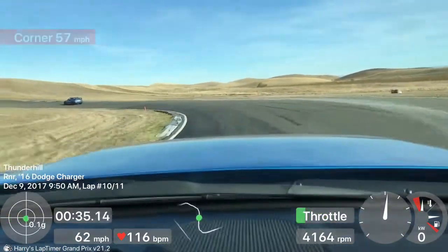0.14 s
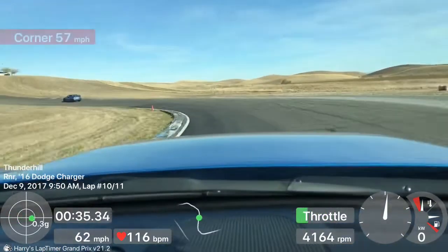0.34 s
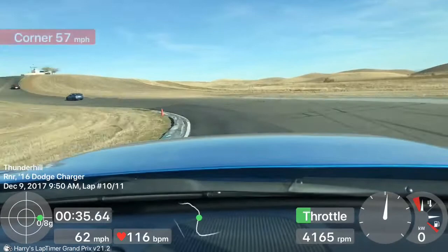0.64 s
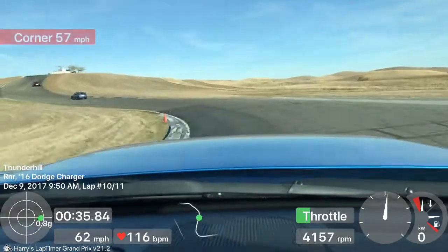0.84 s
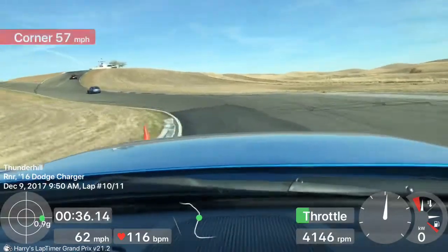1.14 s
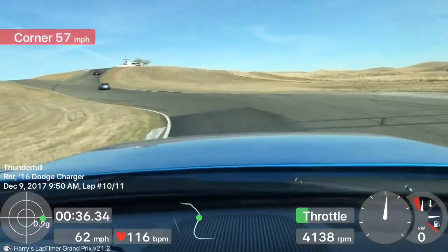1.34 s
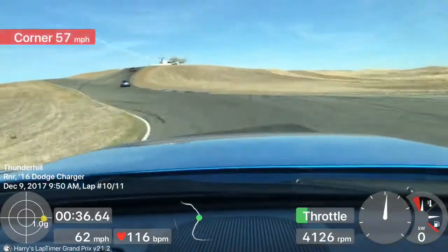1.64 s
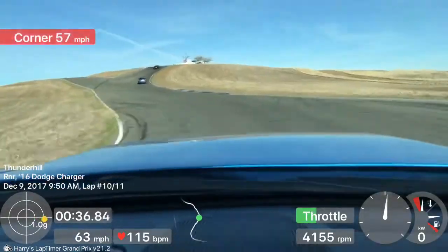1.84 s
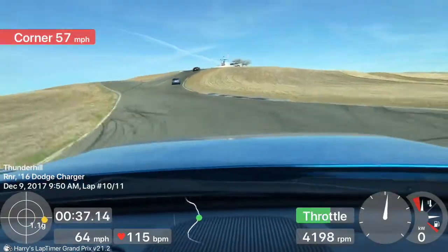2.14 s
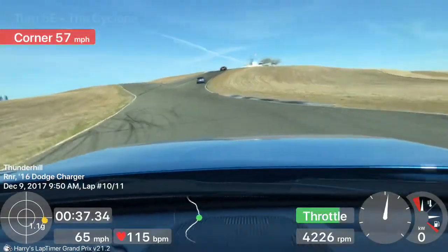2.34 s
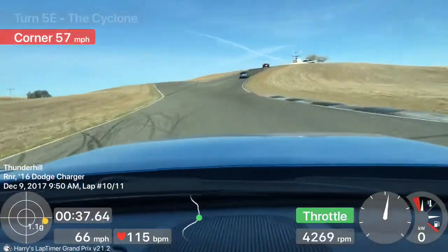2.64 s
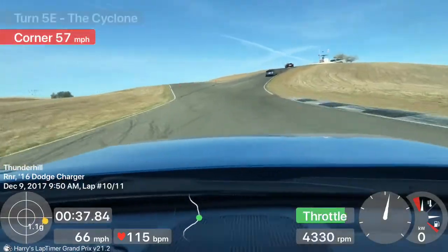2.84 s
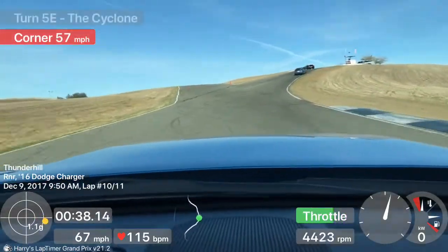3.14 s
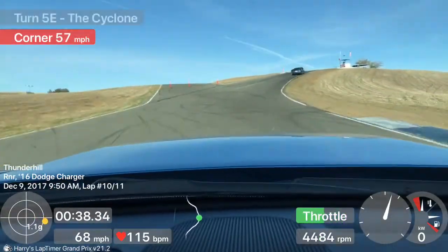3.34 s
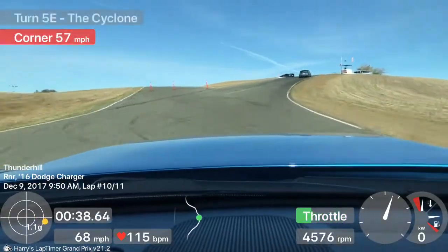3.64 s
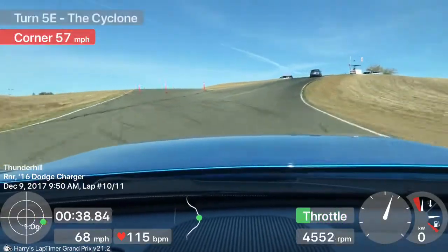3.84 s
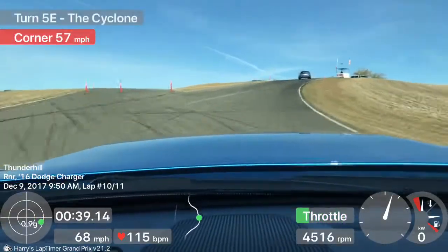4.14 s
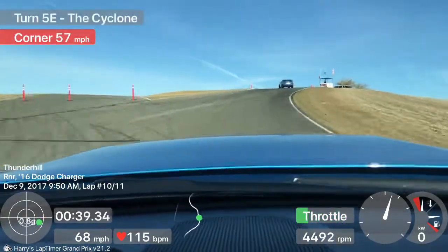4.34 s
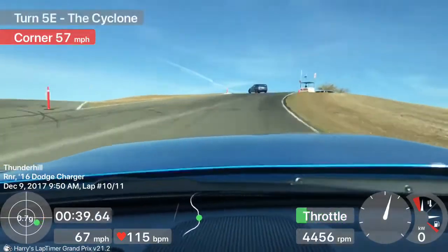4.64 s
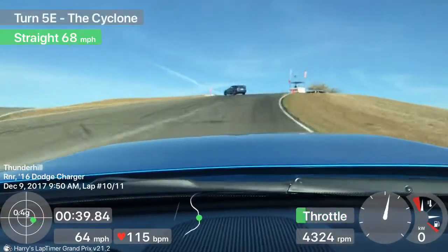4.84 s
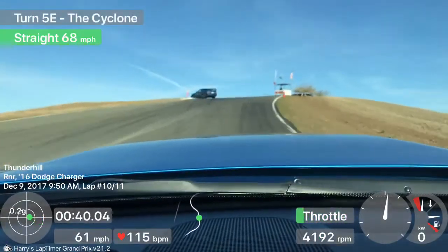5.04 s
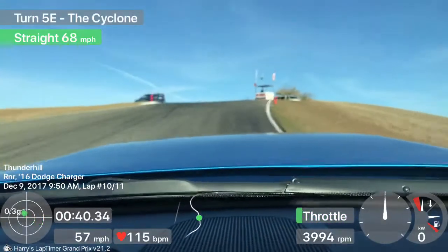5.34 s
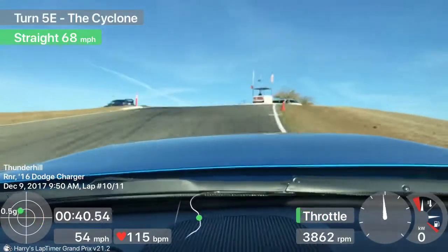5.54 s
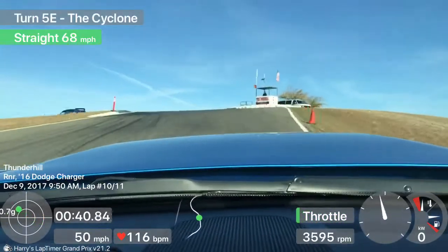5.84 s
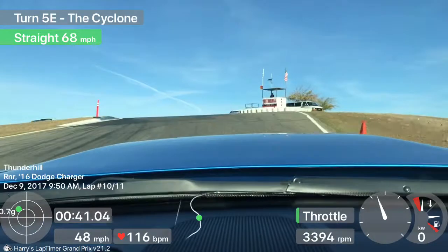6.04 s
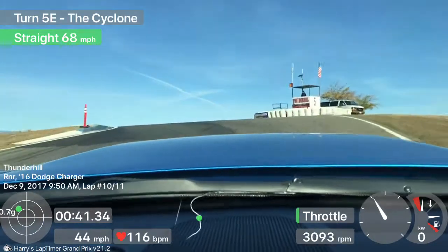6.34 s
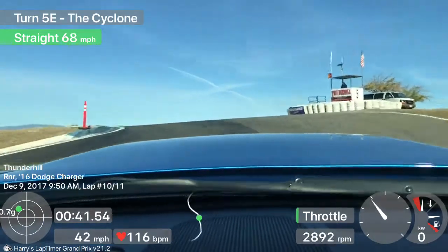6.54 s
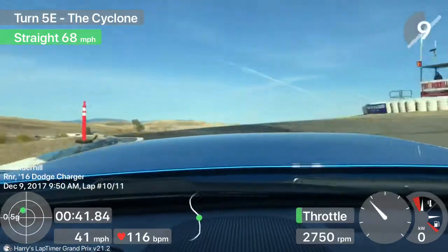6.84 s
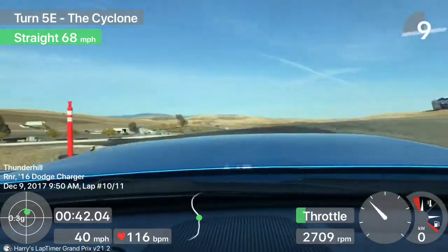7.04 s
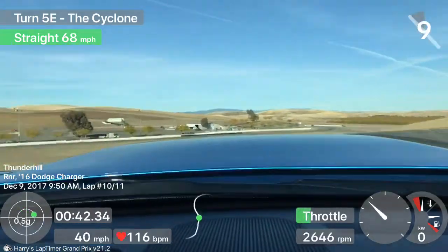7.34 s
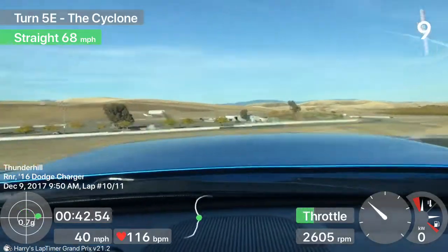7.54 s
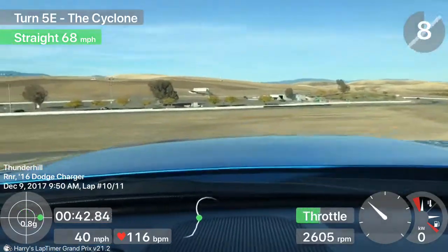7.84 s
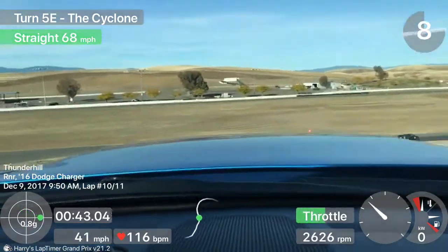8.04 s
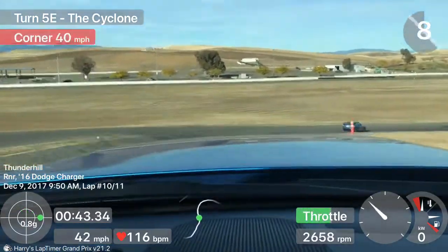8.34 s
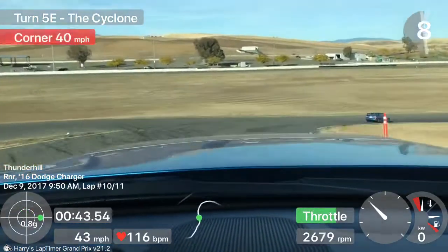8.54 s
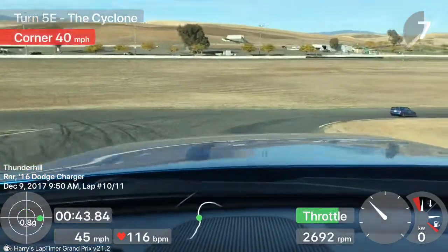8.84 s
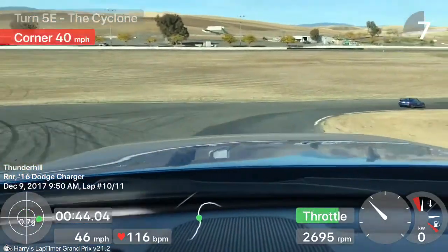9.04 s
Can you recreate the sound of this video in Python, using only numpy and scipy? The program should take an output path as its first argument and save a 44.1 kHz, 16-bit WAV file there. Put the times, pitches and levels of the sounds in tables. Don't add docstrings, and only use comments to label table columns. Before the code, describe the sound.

Heard from the cabin, a powerful engine holds its note, surges, fades for braking with a tyre moan, then growls out of a slow corner.

```python
import sys
import numpy as np
from scipy import signal
from scipy.fft import rfft, irfft
from scipy.io import wavfile
from scipy.ndimage import uniform_filter1d

SR = 44100
rng = np.random.default_rng(int(sys.argv[2]) if len(sys.argv) > 2 else 0)


def natural_amplitude(level_db):
    exponent = np.asarray(level_db, float) / 20
    return 10 ** exponent


def transcribe(signal):
    frames = np.atleast_2d(signal).T
    limited = np.clip(frames, -1, 1)
    pcm = np.round(limited * 32767).astype(np.int16)
    wavfile.write(sys.argv[1], SR, pcm)


N = 405279

# (time [s], level [dB])
CRUISE = [(0, -15), (.3, -16), (1.99, -18.5), (2.13, -23), (2.32, -21.5), (2.66, -33)]
PULL = [(2.02, -44), (2.46, -29.5), (2.95, -18), (3.27, -21.5), (3.36, -31)]
COAST = [(3.32, -32), (3.65, -34), (3.94, -35), (4.56, -27), (4.85, -35.5)]
EXIT = [(5.52, -25.5), (5.8, -22.5), (6.08, -17), (6.9, -18), (6.97, -11), (7.08, -10), (7.3, -13),
        (8.3, -16.5), (9.19, -18.5)]
CRUISE_ORDERS = {6: 0, 4: -27, 9: -20, 10: -21.5, 12: -23.5, 14: -24, 16: -26, 56: -38, 93: -40}, {5: -0.24,
                 11: -15}
PULL_ORDERS = ({8: 0, 4: 0.6, 3: -14, 5: -9.5, 6: -15.5, 16: -13, 20: -30, 70: -36}, {9: -5, 10: -6, 11:
               -13, 14: 1, 17: -12, 18: -3})
COAST_ORDERS = {9: 0, 5: 6.7, 6: -0.39, 10: -8.5}, {14: -1.5, 17: 0, 23: -3.5}
EXIT_ORDERS = {8: 0, 6: -22.5, 7: -27, 9: -26}, {10: 0, 16: 0.45}
# (start level [dB], peak time [s], peak level [dB], end level [dB])
SIDE_ORDERS = [
    (-24.5, 1.47, -31.5, -20.5),
    (-39.5, 2.5, -32, -38),
    (-52, 3.5, -45.5, -43.5),
    (-59, 7.15, -38.5, -54),
]
# (time [s], crank speed [turns/s])
CRANK = [(0, 69.6), (.2, 69.2), (1.99, 69.4), (2.3, 71.5), (2.46, 72.8), (2.95, 77.4), (3.12, 77.8),
         (3.3, 76.3), (3.65, 75.2), (4.56, 74.1), (4.85, 72.2), (5.52, 54), (5.83, 52.2), (6.49, 44),
         (6.9, 42), (7.2, 44.1), (8.3, 46.3), (9.19, 53)]
SPIN_S, SPIN_WIDTH_S, SPIN_HZ = 7.98, .065, 4.4
SPIN_DB = -3
# (time [s], level [dB])
BLOWER = [
    (2.3, -62),
    (2.85, -57),
    (3.18, -62),
    (3.26, -68),
]

# (time [s], pitch [Hz], level [dB], octave level [dB])
SWEEPER_MOAN = [(.38, 501, -37, -30), (.45, 512, -30.5, -39), (.6, 513.3, -34, -49), (.85, 520, -33, -32.5),
                (1.1, 513, -35, -39), (1.3, 510, -35.5, -45.5), (1.95, 519, -37, -42)]
BRAKE_MOAN = [(5.06, 490.4, -37, -50), (5.25, 520, -29.5, -42), (5.33, 557, -30, -37),
              (5.375, 606, -19, -29), (5.44, 610, -21, -28), (5.53, 598, -23, -34.5), (5.56, 570, -39, -62)]
# (time [s], level [dB])
EXIT_MOAN = [(7.42, -40.5), (7.85, -45), (7.98, -42), (8.12, -51), (8.3, -48), (8.5, -55), (8.76, -41),
             (9.19, -45)]
# (start [s], peak [s], end [s], peak level [dB], end level [dB])
SCRUBS = [
    (.05, .6, 2.1, -37.5, -45),
    (5.2, 5.457, 5.57, -35.5, -49.5),
    (6.929, 7.13, 7.19, -47.5, -55),
]
# (frequency [Hz], width [Hz], level [dB])
TREAD = [(1015, 90, 8), (1280, 50, 1), (1570, 60, -6), (2150, 170, -3), (2380, 170, -3), (2800, 110, -4),
         (3100, 150, -12), (4250, 200, -14), (4600, 160, -16), (5300, 350, -18)]
# (frequency [Hz], level [dB])
SLIDE = [(500, -32.5), (800, -13), (1400, 3), (1800, -7.5), (2300, -3), (2650, -8.5), (3100, -10),
         (4000, -19.5), (6000, -27), (9000, -50)]
# (start [s], end [s], first pitch [Hz], last pitch [Hz], peak level [dB])
SONGS = [(.92, 1.916, 1140, 1111, -34.5), (7.02, 7.14, 1137, 1127, -28), (7.12, 7.493, 1110, 1187, -38.5),
         (7.5, 7.778, 1123, 1150, -42), (8.03, 8.206, 1153, 1150, -49.5), (8.2, 8.502, 1105, 1090, -56),
         (8.7, 9.0, 1132, 1173, -56), (7.446, 7.853, 770, 763, -46.5), (7.969, 8.1, 790, 760, -43),
         (8.178, 8.28, 726, 773, -48)]
BRAKING = [(4.8, 7, 178, 192, -22.5), (5.44, 5.72, 210, 160, -20.5), (4.95, 5.3, 63, 65, -11.5),
           (5.32, 5.56, 64, 78, -14.5), (6.86, 7.25, 60, 56, -25)]
WHINES = [(7.42, 7.95, 3080, 3150, -73), (8.62, 9.191, 2830, 3010, -69)]
DRONE = [(5.198, 5.699, 330, 320, -33.5), (6.153, 6.62, 325, 310.7, -33), (6.59, 7.1, 322, 331, -38.5)]
# (share of length rising, rise [dB], sag [dB], flutter [dB])
SWELLS = [
    (0.29, 2, 8.5, 3.5),
    (0.45, 4.5, 13.5, 1.5),
    (.7, 7, -2.5, 4),
    (.5, 3.5, 5.5, -0.5),
]

# (time [s], body level [dB], treble level [dB], decay T60 [s], ping strength [dB])
CLACKS = [(3.8272, -38, -69, 0.063, -6), (4.3023, -21.5, -37, 0.07, -5.5),
          (4.3434, -27.5, -49.5, 0.093, -4), (6.5084, -36, -64, 0.084, -7.5),
          (6.6163, -17.5, -38, 0.07, -1.5), (6.636, -25, -53, 0.09, -1), (6.6558, -30, -59, 0.054, -1),
          (9.0125, -34.5, -51, 0.051, -10), (9.0161, -29, -54.5, 0.07, -4),
          (9.0594, -41.5, -69.5, 0.079, -5)]
# (frequency [Hz], level [dB])
FITTING = [(700, -14), (1100, -6.5), (1500, -14.5), (1850, -1), (2030, 3.5), (2300, -7), (2800, -10),
           (4000, -12), (5500, -15), (7000, -19.5), (9000, -38)]
SNAP = [(5000, -22), (7500, -3.5), (10500, -7), (13000, -1), (15000, -7.5), (15900, -18.5)]
PING_HZ = 1700, 2500
# (time [s], level [dB], pitch [Hz], decay T60 [s])
THUMP = [
    (6.549, -27, 450, 0.14),
    (9.014, -32, 1110, .08),
    (4.282, -44, 2250, .05),
]

# (time [s], road speed [dB], tyre load [dB], surface roughness [dB])
DRIVE = [(0, 1.5, -0.5, -2.5), (.9, 3.5, -0.5, -2), (1.6, 1.4, -0.5, -3), (2.1, -3.5, 1, 0.5),
         (2.7, -0.5, 1.5, 1), (3.25, -4.5, .4, -.5), (3.55, -3.5, -6, -0.9), (3.85, -3.5, -4, 1.8),
         (4.3, .3, -1, 0), (5.15, -0.7, -1, 3.2), (5.45, -5, 2.5, 1), (5.619, -8.5, -1.5, 5),
         (6.35, -11, -3.5, 1), (6.949, -10.5, 6.5, 1.5), (7.4, -14.5, 7, -5.5), (8.0, -16, 1.5, -2),
         (8.55, -20.5, -1, -2.5), (9.19, -16, 1, 1.5)]
# (level [dB], share of speed, share of load)
FOLLOW = [
    (-22, 0.71, .1),
    (-20.5, 0.66, 0.17),
    (-30.5, 0.84, .95),
    (-45, 1.03, .05),
]
# (frequency [Hz], density [dB per Hz])
RUMBLE = [(12, -52.5), (22, -35.5), (30, -28.5), (40, 16.5), (52, 13.5), (66, 18.5), (85, -9.5), (120, -50)]
BOOM = [(60, 6), (100, 0), (140, 4.5), (185, 2.5), (230, -6.5), (320, -6.5), (400, -13.5), (450, -16.5),
        (600, -72.5)]
ROAR = [(300, -4), (440, -10.5), (500, -1), (620, 2), (900, -2), (1300, -6.5), (1450, -10), (1570, -11.5),
        (1800, -16.5), (2300, -18.5), (2600, -31), (2900, -24.5), (3400, -41), (4500, -58.5)]
HISS = [(1000, -13), (1800, 3), (2300, 19), (2620, 11.5), (2950, 13.5), (3500, 7), (5000, 4), (7000, -2),
        (8000, -6), (10500, -9.5), (12500, -11), (16000, -15.5)]
# (time [s], level [dB])
BUMPS = [(.14, 5.5), (2.72, 2.5), (4.5, 1.5), (5.3, 2), (7.04, 6)]
GUSTS = [(2.75, 0), (4.0, 2.5), (4.8, 2.5), (5.8, 2.5), (6.12, 2)]


def engine():
    out = np.zeros(N)
    speed_hz, spin = crank()
    cam_hz = uniform_filter1d(speed_hz, size=2000) / 2
    states = [(CRUISE, CRUISE_ORDERS, .8, .12), (PULL, PULL_ORDERS, .9, .1),
              (COAST, COAST_ORDERS, 1.5, .2), (EXIT, EXIT_ORDERS, .6, .08)]
    for (rows, orders, waver_db, drift), side in zip(states, SIDE_ORDERS):
        s, fade, (lead_db,) = unroll(rows)
        span = slice(round(s * SR), round(s * SR) + len(lead_db))
        state_cam_hz = cam_hz[span]
        count = len(state_cam_hz)
        t = s + np.arange(count) / SR
        start_db, peak, peak_db, end_db = side
        lead_db = lead_db[:count] + SPIN_DB * spin[span]
        side_db = np.interp(t, [s, peak, t[-1]], [start_db, peak_db, end_db]) + 3 * SPIN_DB * spin[span]
        for group, level_db in zip(orders, (lead_db, side_db)):
            for k, db in group.items():
                order = tone(state_cam_hz * k, waver_db, drift * (k / 8) ** .8, 14)
                add(out, s, fade[:count] * natural_amplitude(db + level_db) * order)
    return out + blower(cam_hz)


def blower(cam_hz):
    out = np.zeros(N)
    s, fade, (db,) = unroll(BLOWER)
    whine_hz = 93 * cam_hz[round(s * SR):][:len(db)]
    add(out, s, fade * natural_amplitude(db) * tone(whine_hz, 2.2, .6, 14))
    return out


def tyre_moans():
    out = np.zeros(N)
    speed_hz, spin = crank()
    times = np.linspace(EXIT_MOAN[0][0], EXIT_MOAN[-1][0], num=60)
    level_db = np.interp(times, *np.transpose(EXIT_MOAN))
    slip_hz = 11.5 * speed_hz + 37.9 * np.tanh(3 * spin)
    driven_hz = np.interp(times * SR, np.arange(N), slip_hz)
    exit_moan = np.transpose([times, driven_hz, level_db, level_db - 21.5])
    for rows, rough in zip((SWEEPER_MOAN, BRAKE_MOAN, exit_moan), (.4, .36, .4)):
        s, fade, (hz, db, octave_db) = unroll(rows)
        hz = uniform_filter1d(hz, size=1500)
        moan = natural_amplitude(db) * tone(hz, 3 * rough, rough, 30)
        moan += natural_amplitude(octave_db) * tone(2 * hz, 2.2, 1.2 * rough, 30)
        add(out, s, fade * moan)
    return out


def tread_scrub():
    out = np.zeros(N)
    for (start, peak, end, peak_db, end_db), ringing in zip(SCRUBS, (.8, .2, .5)):
        s, fade, (db,) = unroll([(start, peak_db - 14.5), (peak, peak_db), (end, end_db)])
        slips = rng.standard_normal(len(db)) * natural_amplitude(2.6 * wander(len(db), 54))
        scrub = ringing * evened(rings(slips, TREAD)) + (1 - ringing) * coloured(slips, SLIDE)
        add(out, s, fade * natural_amplitude(db + 7.0) * scrub)
    return out


def sliding_tones():
    out = np.zeros(N)
    for family, swell in zip((SONGS, BRAKING, WHINES, DRONE), SWELLS):
        share, rise_db, sag_db, flutter_db = swell
        for start, end, first_hz, last_hz, db in family:
            peak = start + share * (end - start)
            peak_hz = first_hz + share * (last_hz - first_hz)
            s, fade, (hz, level_db) = unroll([(start, first_hz, db - rise_db), (peak, peak_hz, db),
                                              (end, last_hz, db - sag_db)])
            add(out, s, fade * natural_amplitude(level_db) * tone(hz, flutter_db, 0.72, 25))
    return out


def clacks():
    out, t = np.zeros(N), np.arange(6000) / SR
    for s, db, treble_db, t60, ping_db in CLACKS:
        noise = rng.standard_normal(len(t))
        colour = [(hz, v + ping_db * (PING_HZ[0] < hz < PING_HZ[1])) for hz, v in FITTING]
        body = coloured(noise, colour) * natural_amplitude(db - 7.5 - 60 * t / t60) * np.minimum(t / 0.0035, 1)
        snap = coloured(noise, SNAP) * natural_amplitude(treble_db + 3.5 - 90 * t / t60) * np.minimum(t / .0006, 1)
        add(out, s - .001, body)
        add(out, s - .0025, snap)
    return out


def panel_thumps():
    out, t = np.zeros(N), np.arange(9000) / SR
    for s, db, hz, t60 in THUMP:
        envelope = natural_amplitude(db - 60 * t / t60) * np.minimum(t / 0.012, 1)
        add(out, s, envelope * tone(hz + 0 * t, 2.5, 1.0, 40))
    return out


def road_and_wind():
    s, speed_db, load_db, surface_db = np.transpose(DRIVE)
    t, out = np.arange(N) / SR, np.zeros(N)
    shake_db = np.interp(t, s, surface_db) + humps(BUMPS, .073)
    layers = [(RUMBLE, 1.1, 1.2, .95), (BOOM, 1.2, .9, .9), (ROAR, 1.2, .9, .15),
              (HISS, 1.2, 1.3, .05)]
    sizes = (4096, 2048, 1024, 512)
    for (colour, patchy_db, flicker_db, bumpy), size, (db, fast, loaded) in zip(layers, sizes, FOLLOW):
        hz = np.fft.rfftfreq(size, 1 / SR)
        a, b, patches = rng.standard_normal((N * 4 // size + 6, len(hz), 3), dtype=np.float32).T
        patches = uniform_filter1d(patches, size=5, axis=0)
        patches = evened(uniform_filter1d(patches, size=24, axis=1))
        density = natural_amplitude(read(colour, hz)[:, None] + patchy_db * patches).astype(np.float32)
        z = (a + 1j * b) * density
        noise = evened(signal.istft(z, nperseg=size, noverlap=size * 3 // 4)[1][:N])
        level_db = db + np.interp(t, s, fast * speed_db + loaded * load_db) + bumpy * shake_db
        if colour is HISS:
            level_db = level_db + humps(GUSTS, .061)
        out += noise * natural_amplitude(level_db + flicker_db * wander(N, 17))
    return out


def crank():
    t = np.arange(N) / SR
    spin = np.exp(-((t - SPIN_S) / SPIN_WIDTH_S) ** 2)
    return np.interp(t, *np.transpose(CRANK)) + SPIN_HZ * spin, spin


def tone(hz, waver_db, drift, rate_hz):
    phase = 2 * np.pi * (np.cumsum(hz) / SR + rng.random()) + drift * wander(len(hz), rate_hz)
    return np.sqrt(2) * np.cos(phase) * natural_amplitude(waver_db * wander(len(hz), rate_hz))


def wander(count, hz):
    noise = rng.standard_normal(N // 64 + 2)
    slow = signal.sosfilt(signal.butter(2, hz, fs=SR / 64, output="sos"), noise)
    return evened(np.interp(np.arange(count) / 64, np.arange(len(slow)), slow))


def rings(x, modes):
    out = np.zeros(len(x))
    for hz, width, db in modes:
        peak = signal.iirpeak(hz, hz / width, SR)
        once = signal.lfilter(*peak, x)
        out += natural_amplitude(db) * evened(signal.lfilter(*peak, once))
    return out


def coloured(x, points):
    gain = natural_amplitude(read(points, np.fft.rfftfreq(len(x), 1 / SR)))
    return evened(irfft(rfft(x) * gain, len(x)))


def read(points, hz):
    f, value = np.transpose(points)
    return np.interp(np.log(hz + 1), np.log(f + 1), value)


def evened(x):
    return x / np.sqrt(np.mean(x ** 2) + 1e-20)


def humps(rows, width):
    t = np.arange(0, N + 64, 64) / SR
    rise_db = sum(db * np.exp(-((t - at) / width) ** 2) for at, db in rows)
    return np.interp(np.arange(N) / SR, t, rise_db)


def unroll(rows, fade=0.031):
    s, *columns = np.transpose(rows)
    first, last = s[0] < .05, s[-1] > N / SR - .05
    t = np.arange(0 if first else s[0], N / SR if last else s[-1], 1 / SR)
    edge = np.minimum(1 if first else t - s[0], 1 if last else s[-1] - t)
    return t[0], np.clip(edge / fade, 0, 1), [np.interp(t, s, c) for c in columns]


def add(mix, s, sound):
    part = mix[round(s * SR):][:len(sound)]
    part += sound[:len(part)]


def scene():
    tyres = tyre_moans() + tread_scrub() + sliding_tones()
    return (engine() + tyres + clacks() + panel_thumps() + road_and_wind())[None]


def roll_off(x):
    return signal.sosfilt(signal.butter(12, 15800, fs=SR, output="sos"), x)


def record(dry):
    low_cut = signal.butter(2, 27, "high", fs=SR, output="sos")
    limited = 1.177 * np.tanh(signal.sosfilt(low_cut, dry) / 1.232)
    taper = np.sin(np.pi / 2 * np.minimum(np.arange(N)[::-1] / 90, 1)) ** 2
    return roll_off(taper * limited)


dry = scene()
out = record(dry)
transcribe(out)
```